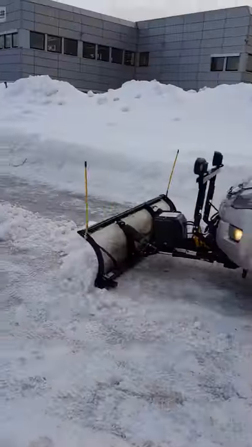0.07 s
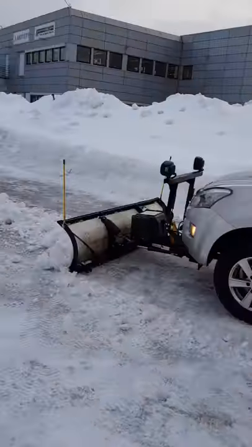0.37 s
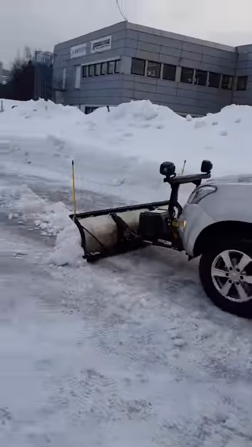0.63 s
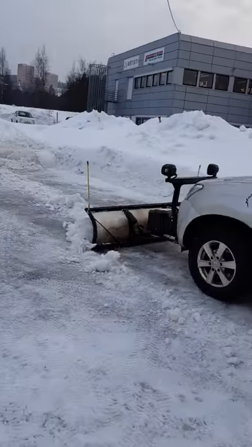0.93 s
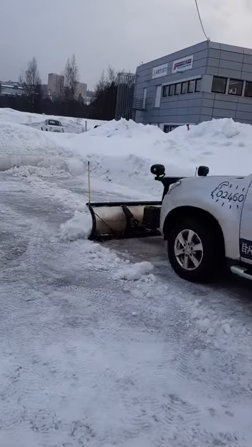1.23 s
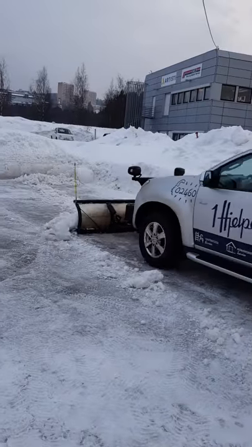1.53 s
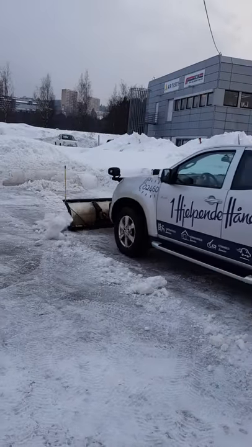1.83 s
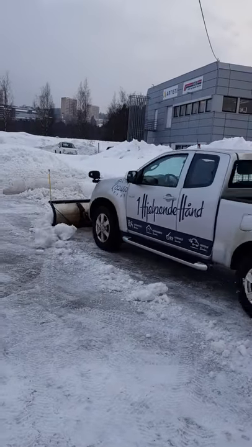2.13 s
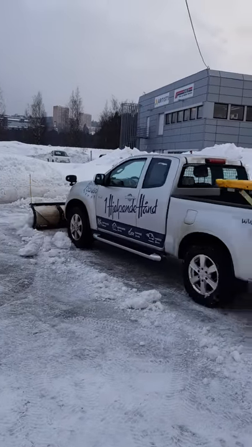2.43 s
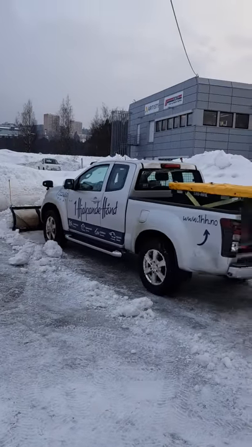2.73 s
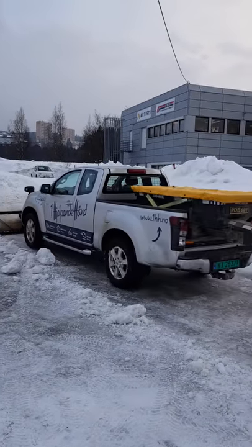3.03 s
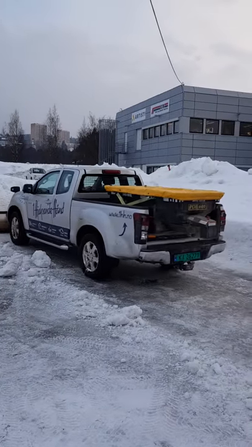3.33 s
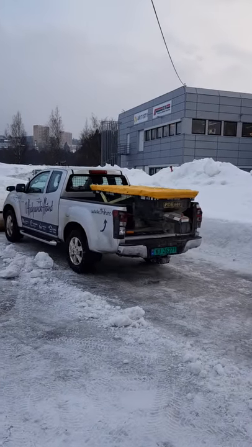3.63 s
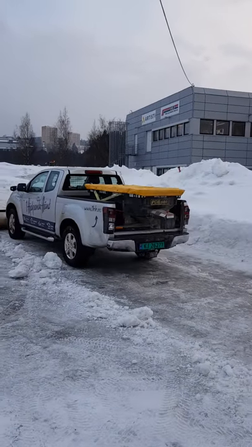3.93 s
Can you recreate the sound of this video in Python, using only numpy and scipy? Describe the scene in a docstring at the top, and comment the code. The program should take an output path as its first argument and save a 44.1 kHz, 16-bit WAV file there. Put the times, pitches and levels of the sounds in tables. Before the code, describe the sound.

Snow plow juddering, clanking and grinding across ice, over a low diesel engine thrum.

```python
"""A steel plow blade judders and booms over packed snow and ice, a few metres from a stereo microphone.
Its edge sticks, slips and grinds, its loose mount clanks, ice cracks, and snow crunches under edge and
tyres. The diesel pickup pushing it crawls past, its firings a low thrum that slows and picks up again.
As the truck turns its tail, a rush from behind it comes up on the right.
A gust of air brushes the microphone."""
import sys
import numpy as np
from scipy import signal
from scipy.fft import rfft, irfft
from scipy.io import wavfile
from scipy.ndimage import uniform_filter1d

SR = 44100
rng = np.random.default_rng(int(sys.argv[2]) if len(sys.argv) > 2 else 0)


def wav_out(sig):
    """Save sig, one row per channel (or a flat mono array), as 16-bit PCM at SR to the path in sys.argv[1]."""
    wavfile.write(sys.argv[1], SR, np.round(np.clip(np.atleast_2d(sig).T, -1, 1) * 32767).astype(np.int16))


N = 176400
T = np.arange(N) / SR
FREQS = np.arange(N // 2 + 1) * SR / N

# Boom of the blade, a few metres off: time_s, level_db
BOOM_LEVEL = [(0, -17.5), (.12, -19.5), (.25, -23), (.43, -16), (.62, -24.5), (.75, -17), (.88, -17.5),
              (1.05, -20.5), (1.5, -24), (1.85, -23.5), (2.15, -27), (2.45, -24.5), (3.05, -24),
              (3.6, -33.5), (3.75, -29), (4, -29.5)]
# Modes of the steel blade: pitch_hz, width_hz, gain_db
BLADE_MODES = [(102.7, 15.6, -7), (136, 53, -4), (175.5, 40.6, -4.5), (221.7, 15.2, -0.5),
               (240.4, 26.6, -5), (303.7, 33, -8.5)]
# Broad body under those modes: frequency_hz, gain_db
BLADE_COLOUR = [(25, -31.5), (80, -10), (150, -1.5), (270, -6), (450, -19), (2500, -82.5)]
# Ridges striking the blade: start_s, relative_db
RIDGE_BUMPS = [(.102, -5.5), (.172, -3), (.31, -5.5), (.427, -0.5), (0.692, -2), (0.752, -2), (0.843, 0),
               (.968, -7), (1.603, -6.5), (2.375, -9), (2.472, -7), (2.655, -7), (2.748, -7), (2.857, -4.5),
               (3.108, -8)]

def blade():
    """The edge sticks and slips in surges, shaking the steel blade; ridges bump it harder."""
    judder = slips(per_s=900, spread_db=0.5) * np.sign(noise())
    judder = unit(judder * undb(1.3 * walk(rate_hz=16)))
    boom = undb(0.5) * ring(judder, BLADE_MODES) + undb(-5.5) * colour(judder, BLADE_COLOUR)
    pushes = fade(blows(RIDGE_BUMPS), decay_s=0.0004)
    bumps = ring(pushes[None], BLADE_MODES)
    return spread(undb(curve(BOOM_LEVEL)) * boom) + undb(-6) * bumps / np.abs(bumps).max()


# Scraping at ground level: time_s, grind_db, rasp_db
SCRAPE_LEVELS = [(0, -22.5, -29), (.08, -25, -36), (.25, -33.5, -35), (.35, -24, -34), (.47, -27.5, -31),
                 (.61, -29, -35), (.72, -21, -31), (.8, -22, -32), (.95, -25.5, -35), (1.25, -26, -38.5),
                 (1.5, -31, -39.5), (1.85, -29.5, -41), (2.2, -32.5, -41.5), (2.9, -33, -42.5),
                 (3.6, -39, -46), (4, -40, -57)]
# The low grind: frequency_hz, gain_db
GRIND_COLOUR = [(200, -27), (340, 1.5), (430, -3.5), (490, 0.5), (710, -3), (800, -8), (1500, -36.5),
                (5000, -58.5)]
# The brighter rasp: frequency_hz, gain_db
RASP_COLOUR = [(500, -14), (900, 5), (1320, 2), (2000, -3), (2400, -5.5), (2800, -13), (9000, -40)]
# Modes of the cutting edge: pitch_hz, width_hz, gain_db
EDGE_MODES = [(1474, 150, 6), (1860, 40, 7.5), (2015, 27, 4.5), (3730, 100, -3), (4650, 130, -8)]

def cutting_edge():
    """The cutting edge grinds and rasps over rough ice, and rings faintly."""
    grit = grains(per_s=700, spread_db=3, decay_s=0.0072, patchy_db=1.5)
    grind = colour(grit, GRIND_COLOUR) * undb(curve(SCRAPE_LEVELS) + 1)
    chips = grains(per_s=900, spread_db=0.5, decay_s=0.0029, patchy_db=0.5)
    chips *= undb(curve(SCRAPE_LEVELS, column=2))
    rasp = short_echoes(colour(chips, RASP_COLOUR))
    return spread(grind + undb(1) * rasp + undb(-10) * ring(chips, EDGE_MODES))


def short_echoes(x, decay_s=0.006, echo_db=-7):
    """Many short echoes colour the scrape, and the colour drifts slowly."""
    t = T[:N // 100]
    tails = rng.standard_normal((2, len(t))) * np.exp(-t / decay_s)
    first, second = (convolve(x, tail / np.linalg.norm(tail)) for tail in tails)
    drift = walk(rate_hz=2)
    echoes = np.cos(drift) * first + np.sin(drift) * second
    return (x + undb(echo_db) * echoes) / np.hypot(1, undb(echo_db))


# Jolts of the mount at the truck's nose: start_s, level_db
MOUNT_JOLTS = [(0.046, -10.5), (0.394, -19), (0.516, -11.5), (0.724, -14), (0.757, -14), (0.775, -13.5),
               (0.797, -10), (0.899, -6.5), (1.012, -15.5), (1.838, -19), (2.388, -20)]
# Modes of the mount: pitch_hz, width_hz, gain_db
MOUNT_MODES = [(581, 30, 8), (705, 55, 9), (2010, 170, -3.5), (2034, 55, -1), (3760, 59, -10)]
# Unpitched rattle in each clank: frequency_hz, gain_db
RATTLE_COLOUR = [(350, -6), (800, 4), (2150, 2), (2900, -10), (4800, -13), (9000, -38)]

def mount():
    """The loose mount slams at each jolt and chatters briefly, ringing its steel."""
    chatter = grains(per_s=2100, spread_db=0.5, decay_s=0.0013, patchy_db=0.5)
    chatter *= fade(blows(MOUNT_JOLTS), decay_s=0.013)
    return undb(-9) * spread(ring(chatter, MOUNT_MODES) + undb(-2.5) * colour(chatter, RATTLE_COLOUR))


# Packed snow giving way: time_s, crunch_db, spray_db
SNOW_LEVELS = [(0, -43.5, -51), (.27, -44.5, -52.5), (.45, -41.5, -51.5), (.62, -45, -51.5),
               (.76, -43, -52), (.97, -42, -49.5), (1.17, -44, -51), (1.28, -37.5, -47), (1.41, -39, -46.5),
               (1.45, -46.5, -51.5), (1.85, -46, -53.5), (2.25, -51.5, -60), (2.43, -45.5, -54),
               (2.53, -51, -58), (3.06, -53.5, -56), (3.3, -57, -63.5), (4, -58.5, -67)]
# Lumps being crushed: start_s, level_db
SNOW_LUMPS = [(.415, -37), (.718, -36), (1.385, -35.5), (1.665, -40.5), (1.965, -41.5), (2.374, -40),
              (2.86, -47)]
# The crunch: frequency_hz, gain_db
CRUNCH_COLOUR = [(1200, -12), (2600, -5), (4500, -2), (5200, -4), (5800, -10), (7500, -22), (15000, -26)]
# Fine spray of crumbs: frequency_hz, gain_db
SPRAY_COLOUR = [(4000, -10), (7700, -1), (10000, 6.5), (14000, 1), (15500, -0.5)]
# Ice breaking under the edge, and one late sharp crunch of a snow lump at 3.11 s: start_s, level_db
ICE_CRACKS = [(0.022, -32), (0.756, -29), (0.798, -30.5), (0.874, -30.5), (0.9076, -35), (1.607, -37.5),
              (1.835, -33), (3.11, -47)]
# The snap of that ice: frequency_hz, gain_db
CRACK_COLOUR = [(1000, -1), (4700, 13.5), (6500, 1.5), (13500, 4), (16000, -5)]

def snow_and_ice(lump_s=0.016):
    """Snow crunches against the ringing edge, lumps collapse, crumbs spray, and at times ice cracks."""
    # Fading twice rounds each lump into a swell that peaks after lump_s.
    lumps = fade(fade(blows(SNOW_LUMPS), lump_s), lump_s) * np.e / (lump_s * SR)
    crushing = np.hypot(undb(curve(SNOW_LEVELS) + 2), lumps)
    spraying = np.hypot(undb(curve(SNOW_LEVELS, column=2) + 0.5), undb(-19) * lumps)
    fractures = grains(per_s=2800, spread_db=2, decay_s=0.0022, patchy_db=0.64)
    crumbs = grains(per_s=3500, spread_db=3, decay_s=0.0014, patchy_db=0.1)
    crunch = colour(fractures, CRUNCH_COLOUR) * crushing
    spray = colour(crumbs, SPRAY_COLOUR) * spraying
    cracks = colour(noise() * fade(blows(ICE_CRACKS), decay_s=0.008), CRACK_COLOUR)
    ringing = undb(-8.5) * ring(crunch, EDGE_MODES)
    return spread(short_echoes(crunch + spray) + ringing + undb(2.5) * cracks)


# Tyres passing the microphone: time_s, centre_hz, level_db
TYRE_PASS = [(0, 600, -44), (1.2, 620, -34), (1.52, 620, -43), (1.64, 620, -33.5), (1.88, 800, -38),
             (2.2, 680, -47), (2.8, 500, -41), (3.12, 398.6, -26.5), (3.27, 400, -42), (3.38, 380, -30),
             (3.52, 360, -63)]

def tyres(width_hz=265):
    """A band of tread roar that lifts a little, then sinks in pitch as the wheels go by."""
    tread = signal.sosfilt(signal.butter(3, width_hz / 2, fs=SR, output="sos"), noise())
    roar = unit(tread * np.sin(2 * np.pi * np.cumsum(curve(TYRE_PASS)) / SR))
    return spread(roar * undb(curve(TYRE_PASS, column=2)))


# The diesel at a crawl: time_s, firing_hz, level_db
ENGINE_RUN = [(0, 40, -32.5), (.8, 40.4, -50), (1.7, 33.6, -39), (2.3, 26.6, -50), (2.85, 32, -45.5),
              (3.45, 41.6, -63), (4, 34.5, -40)]
# Clatter of the block: frequency_hz, gain_db
CLATTER_COLOUR = [(200, -18), (550, -1), (1800, -10), (8000, -40.5)]

def engine(puff_s=0.0047, tick_s=0.0018, pipe_hz=45):
    """Each firing puffs through the muffler and ticks in the block."""
    firing_hz = curve(ENGINE_RUN) * (1 + 0.027 * walk(rate_hz=8.9))
    since_firing_s = np.cumsum(firing_hz) / SR % 1 / firing_hz
    strength = undb(2.4 * walk(rate_hz=38.1))
    puffs = strength * since_firing_s * np.exp(-since_firing_s / puff_s)
    muffler = signal.butter(2, [pipe_hz / 2, pipe_hz], "band", fs=SR, output="sos")
    thrum = unit(signal.sosfilt(muffler, puffs))
    ticks = noise() * strength * np.exp(-since_firing_s / tick_s)
    clatter = spread(unit(colour(ticks, CLATTER_COLOUR)))
    return undb(curve(ENGINE_RUN, column=2)) * (thrum + undb(-2) * clatter)


# The tail turning toward the microphone: time_s, level_db
TAIL_LEVEL = [(0, -71), (2.8, -47.5), (3.4, -45), (4, -38.5)]
# Rush from behind the truck: frequency_hz, gain_db
RUSH_COLOUR = [(400, -6), (1100, -2.5), (1650, -2.5), (2500, -8), (4500, -29.5), (12000, -42)]
# Drone of the muffler: frequency_hz, gain_db
DRONE_COLOUR = [(30, -37), (80, 0.5), (135, -1), (260, -8), (1500, -70)]

def truck_tail(right_lead_db=4.5):
    """A smooth rush from behind the truck, to the right, over the drone of the muffler."""
    pan = undb([[-right_lead_db / 2], [right_lead_db / 2]])
    rush = pan * spread(colour(noise(), RUSH_COLOUR))
    drone = spread(colour(noise(), DRONE_COLOUR))
    return undb(curve(TAIL_LEVEL)) * (rush + undb(3.5) * drone)


# Wind rumble right on the microphone: frequency_hz, gain_db
WIND_COLOUR = [(33, -11), (70, 11), (140, 4), (260, -7), (1500, -73)]
# Gusts reaching it: time_s, relative_db
WIND_GUSTS = [(0, -12), (.25, -9), (.76, 14.5), (1.03, 3.5), (1.25, -13), (1.37, 1), (1.5, -13), (2.35, 7),
              (2.6, -13), (3.4, -28)]

def breeze():
    """Light air rumbles on each microphone port separately."""
    return colour(noise(), WIND_COLOUR) * undb(curve(WIND_GUSTS) - 36)


# Likeness of left and right at the microphone: frequency_hz, likeness_0_to_1
PORT_LIKENESS = [(100, 1), (290, 1), (640, 0.85), (1300, 0.64), (2400, .5), (4500, 0.1), (8000, 0.27)]

def spread(pair):
    """Send a shared and a scattered signal to left and right; bass stays alike, treble does not."""
    shared, scattered = pair
    alike = np.clip(by_hz(PORT_LIKENESS), 0, 0.99)
    side = irfft(rfft(scattered) * np.sqrt((1 - alike) / (1 + alike)), N)
    return np.array([shared + side, shared - side])


def undb(db):
    """Decibels to gain."""
    return 10 ** (np.asarray(db) / 20)


def unit(x):
    """Scale to rms 1."""
    return x / np.sqrt(np.mean(x ** 2))


def curve(rows, column=1):
    """One column of a time table, at every sample."""
    rows = np.array(rows)
    return np.interp(T, rows[:, 0], rows[:, column])


def by_hz(points):
    """Points joined on a log-frequency axis."""
    hz, values = np.array(points).T
    return np.interp(np.log(FREQS + 1), np.log(hz), values)


def convolve(x, response):
    """Pass each channel through one impulse response."""
    return signal.fftconvolve(x, response[None], axes=1)[:, :N]


def colour(x, points):
    """Minimum-phase filter through (Hz, dB) points; keeps the power of white noise."""
    cepstrum = irfft(np.log(unit(undb(by_hz(points)))), N)
    cepstrum[1:N // 2] *= 2
    cepstrum[N // 2 + 1:] = 0
    return convolve(x, irfft(np.exp(rfft(cepstrum)), N)[:N // 20])


def ring(x, modes):
    """Drive damped modes of alternating sign; keeps the power of white noise."""
    t = T[:N // 10]
    response = np.zeros(len(t))
    for k, (hz, width_hz, db) in enumerate(modes):
        envelope = undb(db) * np.sqrt(width_hz) * np.exp(-np.pi * width_hz * t)
        response += (-1) ** k * envelope * np.sin(2 * np.pi * hz * t)
    return convolve(x, response / np.linalg.norm(response))


def noise():
    """Two unrelated white noises."""
    return rng.standard_normal((2, N))


def walk(rate_hz):
    """A smooth random wander of rms 1."""
    hold = int(SR / rate_hz)
    steps = rng.standard_normal(N)[np.arange(N) // hold]
    return unit(uniform_filter1d(steps, hold))


def slips(per_s, spread_db):
    """Random impulses of uneven size."""
    return (rng.random(N) < per_s / SR) * undb(spread_db * np.minimum(rng.exponential(size=N), 5))


def fade(x, decay_s):
    """Give every impulse an exponential tail."""
    return signal.lfilter([1], [1, -np.exp(-1 / (decay_s * SR))], x)


def blows(rows):
    """An impulse for each row."""
    impulses = np.zeros(N)
    for start_s, level_db in rows:
        impulses[int(start_s * SR)] += undb(level_db)
    return impulses


def grains(per_s, spread_db, decay_s, patchy_db):
    """Dense tiny fractures that come in patches."""
    bursts = noise() * np.sqrt(fade(slips(per_s, spread_db) ** 2, decay_s))
    return unit(bursts * undb(patchy_db * walk(rate_hz=30.14)))


def scene():
    """All sources in the open, over sound-absorbing snow."""
    plow = blade() + cutting_edge() + mount() + snow_and_ice()
    return plow + tyres() + engine() + truck_tail() + breeze()


# Imbalance of the microphone's two ports: frequency_hz, left_minus_right_db
PORT_BALANCE = [(60, 1), (200, -1.2), (380, 0), (680, 0.7), (1200, -2), (2400, -2.5), (3300, 3),
                (4500, -5.5), (6500, 0), (8500, 6.5), (11000, 3), (14500, 15)]

def record(dry):
    """The two ports differ in colour; the tallest peaks are rounded and the top is cut."""
    ceiling, top_hz = 0.95, 15800
    tilt_db = by_hz(PORT_BALANCE)
    ports = undb([tilt_db / 2, -tilt_db / 2])
    ports /= np.sqrt(np.mean(ports ** 2, axis=0))
    heard = irfft(rfft(dry) * ports, N)
    rounded = heard / (1 + (heard / ceiling) ** 6) ** (1 / 6)
    return signal.sosfilt(signal.ellip(10, 0.2, 80, top_hz, fs=SR, output="sos"), rounded)


dry = scene()
out = record(dry)
wav_out(out)
```